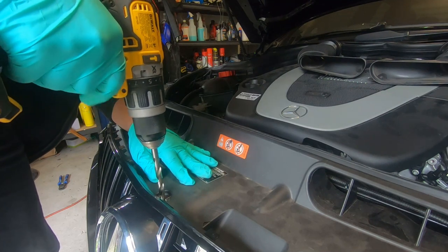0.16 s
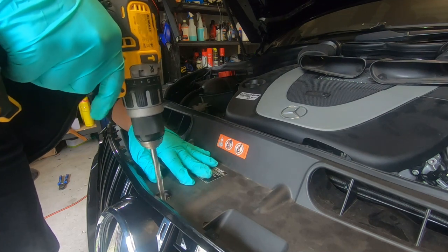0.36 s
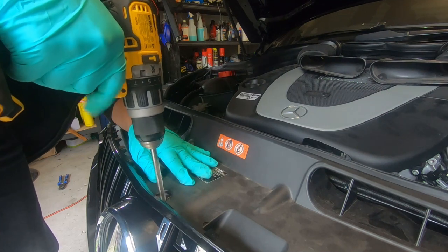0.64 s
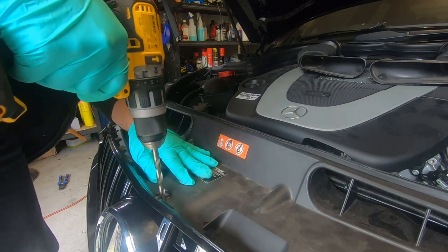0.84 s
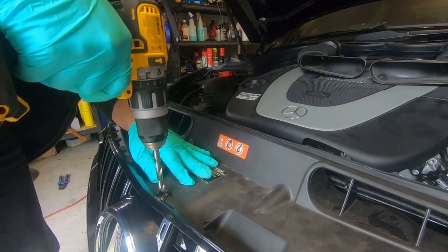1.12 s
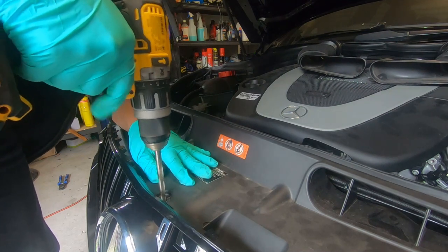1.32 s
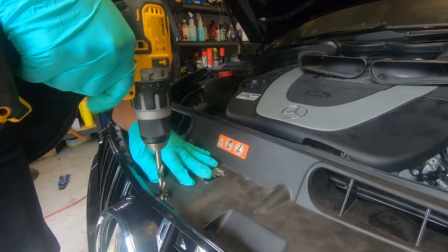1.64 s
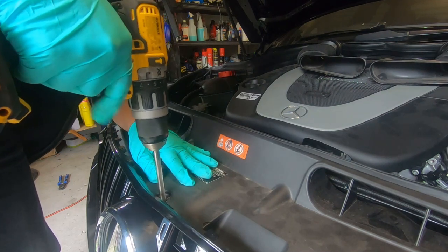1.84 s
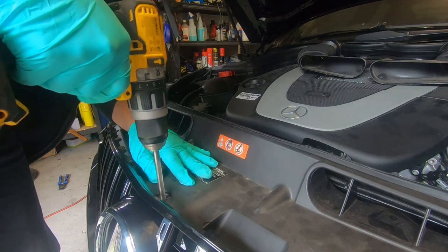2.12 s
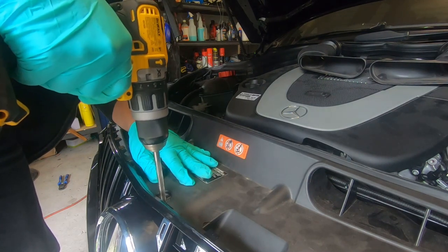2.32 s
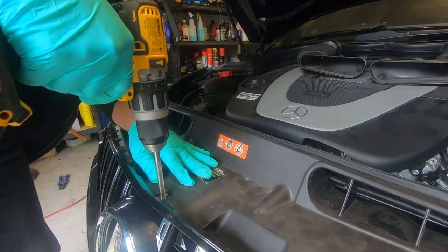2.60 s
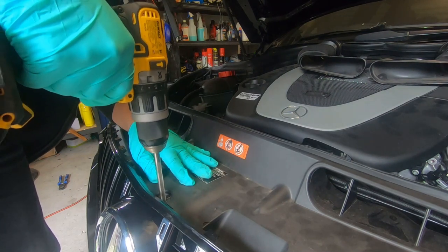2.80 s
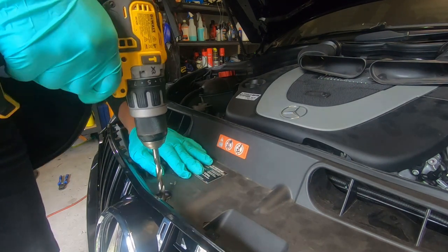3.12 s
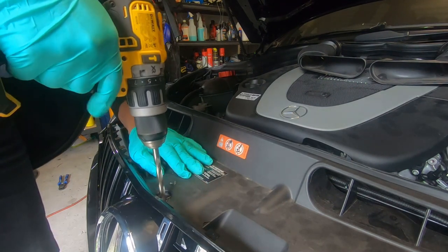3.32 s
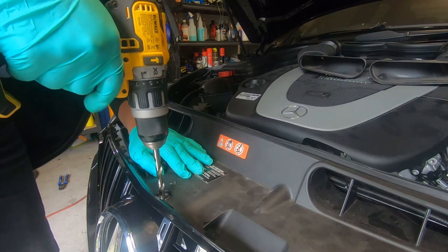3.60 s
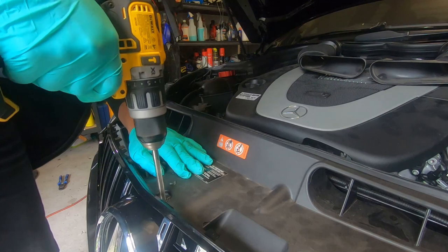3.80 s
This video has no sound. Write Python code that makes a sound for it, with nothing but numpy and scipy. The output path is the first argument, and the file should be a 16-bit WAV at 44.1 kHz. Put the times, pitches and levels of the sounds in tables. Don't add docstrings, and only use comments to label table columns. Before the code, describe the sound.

Close-miked power drill in a garage: repeated brief spin-ups and rattling stops, a sustained gritty buzz with a sharp snap, a short hush, then three lower growling runs with clicks and a squeak.

```python
import sys
import numpy as np
from scipy import signal
from scipy.fft import rfft, irfft, next_fast_len
from scipy.io import wavfile
from scipy.ndimage import uniform_filter1d, map_coordinates

SR = 44100
rng = np.random.default_rng(int(sys.argv[2]) if len(sys.argv) > 2 else 0)


def magnitude_from_level(level_db):
    exponent = np.asarray(level_db, float) / 20
    return 10 ** exponent


def bounce(signal):
    frames = np.transpose(np.atleast_2d(signal))
    limited = np.clip(frames, -1, 1)
    pcm = np.round(limited * 32767).astype(np.int16)
    wavfile.write(sys.argv[1], SR, pcm)


N = 174195
CUT_S, RESUME_S = 3.0245, 3.125

# frequency in Hz, level in dB per Hz.
KNOCK_COLOUR = [(90, -13.5), (180, -8.5), (330, -7), (480, -14.5), (800, 0), (2150, -4.5), (4550, -6.5),
                (9000, -34.5)]


def unit(x):
    return x / np.sqrt(np.mean(x ** 2) + 1e-20)


def along(points, hz):
    f, v = np.transpose(points)
    return np.interp(np.log(hz + 1), np.log(f + 1), v)


def wobble(rate):
    return map_coordinates(rng.standard_normal(N // 20), [np.arange(N) * rate / SR])


def noise():
    return rng.standard_normal(N)


def filtered(x, response):
    m = next_fast_len(N + SR // 2)
    return irfft(rfft(x, m) * response(np.fft.rfftfreq(m, 1 / SR)), m)[:N]


def coloured(x, points):
    gain = magnitude_from_level(along(points, np.fft.rfftfreq(4096, 1 / SR)))
    cepstrum = irfft(np.log(np.maximum(gain, 1e-6)))
    cepstrum[1:2048] *= 2
    cepstrum[2049:] = 0
    pulse = irfft(np.exp(rfft(cepstrum)))
    return signal.fftconvolve(x, pulse / np.linalg.norm(pulse))[:N]


def trigger():
    # first knock, release and stop in seconds, top mesh rate in Hz, level in dB.
    pulls = [(-.19, -0.12, 0.011, 266, -12), (.2985, .375, .466, 240, -13),
             (0.632, 0.721, 0.81, 279.8, -13), (0.915, 1.021, 1.119, 280.4, -14),
             (1.236, 1.324, 1.412, 282.4, -14.5), (1.501, 1.599, 1.688, 283.5, -14),
             (1.803, 1.901, 2.0035, 281.5, -14.5), (2.068, 3.098, 3.29, 280.9, -15.5),
             (3.218, 3.337, 3.412, 146.6, -13), (3.524, 3.62, 3.668, 148, -13.5),
             (3.749, 4.102, 4.3, 142.4, -14)]
    first_knock_hz, last_knock_hz = 90.07, 65.02
    spin_up_s, brake_curve = 0.095, 1.6
    settle_db, settle_s = -0.5, 0.16
    take_up_s, take_up_db, take_up_rise_db = 0.016, -17.5, 13.5
    t = np.arange(N) / SR
    rate, share, turns, gain, braking, slack, held = np.zeros((7, N))
    for start, release, stop, top_hz, db in pulls:
        on = (t >= start) & (t < stop) & ((t < CUT_S) | (start > RESUME_S))
        up = np.sin(np.pi / 2 * np.clip((t[on] - start) / spin_up_s, 0, 1))
        braking[on] = np.clip((t[on] - release) / (stop - release), 0, 1) ** brake_curve
        driven = first_knock_hz + (top_hz - first_knock_hz) * up
        rate[on] = driven + (last_knock_hz - driven) * braking[on]
        share[on] = rate[on] / top_hz
        turns[on] = np.ceil(turns.max()) + 1 + np.cumsum(rate[on]) / SR
        steady_s = np.maximum(np.minimum(t[on], release) - start - spin_up_s, 0)
        held[on] = 1 - np.exp(-steady_s / settle_s)
        gain[on] = magnitude_from_level(db + settle_db * held[on])
        before = (t >= start - take_up_s) & (t < start)
        slack[before] = magnitude_from_level(db + take_up_db + take_up_rise_db * (t[before] - start) / take_up_s)
    return rate, share, turns, gain, braking, slack, held


def gear_knocks(rate, share, loose, gain, braking, held, slow):
    # frequency in Hz, level in dB per Hz.
    tick_colour = [(5000, -32), (6500, -5.5), (7300, 0), (7900, -1), (8600, -1), (10300, 2), (12500, -9.5),
                   (15600, -30.5)]
    knock_db, held_db, slow_db = -3, -11.5, 1
    knock_s, tick_s, tick_db = 0.0035, 0.0007, -26
    grows, slow_grows, brake_db = 0.065, 0.63, -2.5
    since = loose % 1 / np.maximum(rate, 1)

    def dying(s):
        return np.exp(-since / s) / np.sqrt(s * 140)

    force = gain * share ** (grows + slow_grows * slow) * magnitude_from_level(brake_db * braking)
    level = magnitude_from_level(knock_db + np.where(slow, slow_db, held_db * held))
    knocks = coloured(level * force * dying(knock_s) * noise(), KNOCK_COLOUR)
    edge = dying(tick_s) + 1.24 * share ** 1.7
    ticks = coloured(force * share ** (0.35 * slow) * edge * noise(), tick_colour)
    return knocks + magnitude_from_level(tick_db) * ticks


def whirr(share, loose, gain):
    # frequency in Hz, level in dB per Hz.
    friction = [(60, -16.5), (600, -25), (800, -7), (2150, -0.5), (2400, -7.5), (3900, 0.5), (5600, -2.5),
                (8000, -47.5)]
    # centre in Hz, width in Hz, level in dB.
    housing = [(2112, 60, -16.5), (2137, 230, -23.5), (741, 31, -21), (1026, 140, -30.5), (1239, 25, -23),
               (5314, 1000, -9.5)]
    direct_db, grows, case_top_hz = -2, 1.22, 6100
    mesh = 1 + 0.18 * np.cos(2 * np.pi * loose)
    roughness = unit(magnitude_from_level(3 * wobble(1500) + 0.87 * wobble(30.04)) * noise())
    grit = gain * share ** grows * mesh * roughness

    def case(f):
        modes = 0
        for centre, width, db in housing:
            strength = magnitude_from_level(db) * 1j * f * np.sqrt(width * SR / np.pi)
            modes = modes + strength / (centre ** 2 - f ** 2 + 1j * f * width)
        return modes / (1 + (f / case_top_hz) ** 10)

    return magnitude_from_level(direct_db) * coloured(grit, friction) + filtered(grit, case)


def mesh_hum(rate, share, turns, gain, held, slow):
    # frequency in Hz, level in dB.
    fast_hum = [(130, -11), (200, -4), (282, -12), (563, 1), (845, -3), (1400, 0), (1700, -1), (2400, -18)]
    # frequency in Hz, level in dB.
    slow_hum = [(100, -6.5), (146, -3.5), (290, 4), (435, -7), (580, -0.5), (900, 0.5), (1500, -14),
                (2500, -11.5)]
    hum_db, slow_db, unsettled_db, waver_db = -11.5, -4, -1.5, 1.2
    grows, drift_rad = 0.92, 0.15
    meshes_per_chuck_turn, chuck_depth = 9, 0.067
    orders = np.arange(1, 17)[:, None]
    drift = drift_rad * np.array([wobble(27) for _ in orders])
    phase = rng.uniform(0, 2 * np.pi, orders.shape) + drift
    waver = waver_db * np.array([wobble(20) for _ in orders])
    level = np.where(slow, slow_db + along(slow_hum, orders * rate), along(fast_hum, orders * rate))
    lines = magnitude_from_level(level + waver) * np.cos(2 * np.pi * orders * turns + phase)
    chuck = 1 + chuck_depth * np.cos(2 * np.pi * turns / meshes_per_chuck_turn)
    return magnitude_from_level(hum_db + unsettled_db * (1 - held)) * gain * share ** grows * chuck * lines.sum(0)


def take_up(slack):
    # frequency in Hz, level in dB per Hz.
    rasp = [(400, -48), (800, -14), (2600, 2), (4200, -1), (6000, -14.5), (9000, -43.5)]
    return coloured(slack * magnitude_from_level(4.2 * wobble(300)) * noise(), rasp)


def drill():
    rate, share, turns, gain, braking, slack, held = trigger()
    slow = np.arange(N) / SR > RESUME_S
    gain = gain * magnitude_from_level(-9 * braking * slow)
    loose = turns + 0.1 * share * np.abs(wobble(200))
    knocks = gear_knocks(rate, share, loose, gain, braking, held, slow)
    hum = mesh_hum(rate, share, turns, gain, held, slow)
    return knocks + whirr(share, loose, gain) + hum + take_up(slack)


def clicks():
    # start in seconds, peak in dB, decay in seconds.
    snaps = [
        (0.2771, -32, 0.021),
        (2.8017, -5.5, 0.0046),
        (3.1248, -38.5, 0.0011),
        (3.127, -59.5, 0.082),
        (3.181, -46, 0.023),
        (3.195, -29, 0.0043),
        (3.21, -25.5, .012),
        (3.7138, -28.5, 0.0026),
        (3.728, -26, 0.0014),
    ]
    # frequency in Hz, level in dB per Hz.
    snap_colour = [(300, -21.5), (1000, -4), (2500, 1.5), (4500, 3), (6500, -16.5), (9000, -30),
                   (15700, -50)]
    t = np.arange(N) / SR
    puffs = np.zeros(N)
    for start, db, decay in snaps:
        dying = np.exp(-np.maximum(t - start, 0) / max(decay, 1e-4))
        puffs += magnitude_from_level(db + 1) * (t >= start) * dying
    return coloured(puffs * noise(), snap_colour)


def squeak():
    start_s, long_s, top_hz, fall_hz, db = 3.32, 0.06, 3250, 1200, -18
    u = (np.arange(N) / SR - start_s) / long_s
    pitch = top_hz - fall_hz * np.clip(u, 0, 1) ** 1.8
    swell = (abs(u - 0.5) < 0.5) * np.sin(np.pi * u)
    return magnitude_from_level(db + 1.3 * wobble(150)) * swell * np.sin(2 * np.pi * np.cumsum(pitch) / SR)


def panel(x):
    t60_s = 0.07
    t = np.arange(SR // 10) / SR
    ring = uniform_filter1d(rng.standard_normal(len(t)), size=3) * magnitude_from_level(-60 * t / t60_s)
    return signal.fftconvolve(x, ring / np.linalg.norm(ring))[:N]


def flex():
    # centre in seconds, width in seconds, signed push.
    pushes = [
        (3.35, 0.018, 0.39),
        (3.414, 0.028, -.3),
        (3.5, 0.09, 0.048),
        (3.83, .04, -0.02),
        (3.88, 0.015, .36),
        (3.93, 0.074, -0.13),
    ]
    t = np.arange(N) / SR
    return sum(push * np.exp(-0.5 * ((t - s) / width) ** 2) for s, width, push in pushes)


def garage(x, lead_db):
    # frequency in Hz, time to fall 60 dB in seconds.
    t60 = [(200, .5), (1000, .55), (4000, .42), (9000, .26), (13000, .1)]
    hz, t, z = signal.stft(rng.standard_normal(SR // 2), SR, nperseg=256)
    tail = signal.istft(z * magnitude_from_level(-60 * t / along(t60, hz)[:, None]), SR, nperseg=256)[1]
    lead = SR // 5
    earlier = magnitude_from_level(lead_db) * coloured(noise(), KNOCK_COLOUR)[:lead]
    earlier = earlier * (np.arange(lead) < 0.16 * SR)
    answer = signal.fftconvolve(np.concatenate([earlier, x]), tail / np.linalg.norm(tail))
    return answer[lead:][:N]


def handling_rumble():
    # frequency in Hz, level in dB per Hz.
    rumble = [(1, -31), (4, 4.5), (12, -12), (30, -16), (70, -24), (130, -22.5), (350, -35), (500, -59)]
    gap = abs(np.arange(N) / SR - 3.11) < 0.085
    level = magnitude_from_level(-38.5 + wobble(6.9) - 15.5 * gap)
    return unit(filtered(noise(), lambda f: magnitude_from_level(along(rumble, f)))) * level


def compressor():
    # frequency in Hz, level in dB.
    tones = [(708, -55), (1418, -60), (2125, -59)]
    t = np.arange(N) / SR
    whine = np.zeros(N)
    for hz, db in tones:
        whine += magnitude_from_level(db + 2.1 * wobble(20)) * np.sin(2 * np.pi * hz * t + 1.5 * wobble(30))
    return whine * (t < 0.35)


def room_air():
    first_air = [(60, -13), (300, -8), (700, -26), (2200, -18), (3500, -26), (8000, -23), (11000, -52.5)]
    # frequency in Hz, level in dB per Hz.
    later_air = [(60, 3.5), (300, 1.5), (1000, -0.5), (2000, -18.5), (5000, -31), (9000, -55)]

    def hiss(points):
        return unit(filtered(noise(), lambda f: magnitude_from_level(along(points, f))))

    return np.where(np.arange(N) / SR < CUT_S, magnitude_from_level(-55.5) * hiss(first_air), magnitude_from_level(-62) * hiss(later_air))


def scene():
    # frequency in Hz, level in dB.
    side_tone = [(30, -1), (70, 8), (300, 7), (700, 1), (1500, -1), (5000, 3), (9000, 14), (14000, 9)]
    panel_db, garage_db, side_db = -12, -16, -36
    fade_s, fade_db = 2.924, -6.5
    t = np.arange(N) / SR
    near = drill() + clicks() + squeak()

    def in_garage(x, lead_db):
        return x + magnitude_from_level(panel_db) * panel(x) + magnitude_from_level(garage_db) * garage(x, lead_db)

    first, second = t < CUT_S, t >= RESUME_S
    fade = first * magnitude_from_level(fade_db * np.clip((t - fade_s) / (CUT_S - fade_s), 0, 1))
    takes = fade * in_garage(near * first, lead_db=-12) + in_garage(near * second, lead_db=-120)
    mid = takes + flex() + handling_rumble() + compressor() + room_air()
    side = magnitude_from_level(side_db) * filtered(mid, lambda f: 1j * magnitude_from_level(along(side_tone, f)))
    return np.array([mid + side, mid - side])


def band_limit(x):
    return signal.sosfilt(signal.butter(12, 15750, fs=SR, output="sos"), x)


def record(dry):
    ceiling, knee, top_hz = 0.95, 4, 15750
    held = dry / (1 + abs(dry / ceiling) ** knee) ** (1 / knee)
    mix = np.array([filtered(x, lambda f: f < top_hz) for x in held])
    return band_limit(mix)


dry = scene()
out = record(dry)
bounce(out)
```